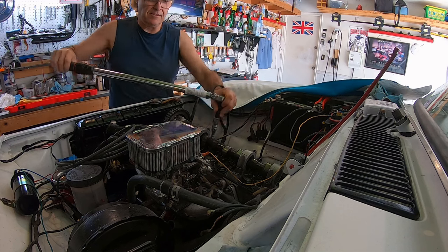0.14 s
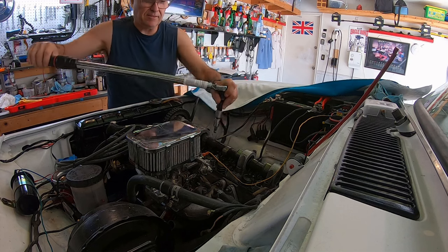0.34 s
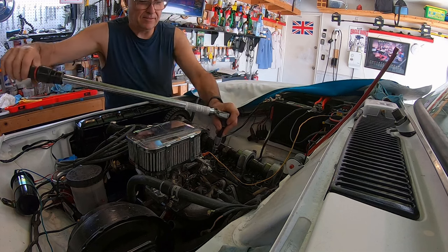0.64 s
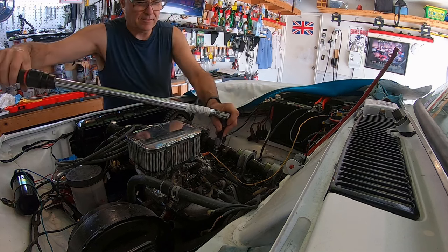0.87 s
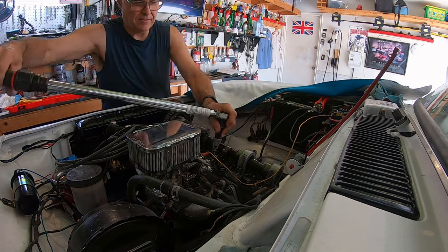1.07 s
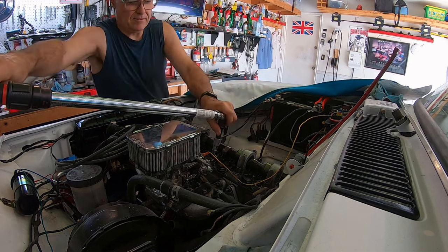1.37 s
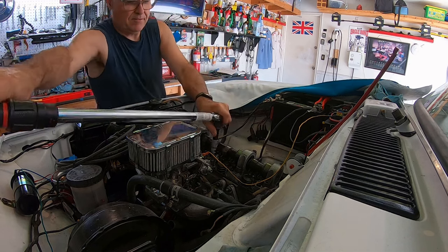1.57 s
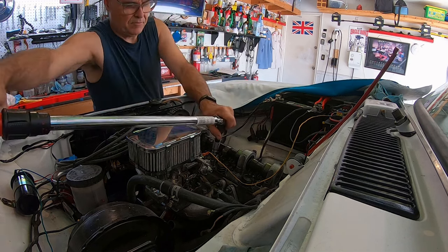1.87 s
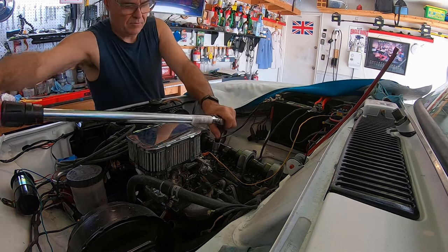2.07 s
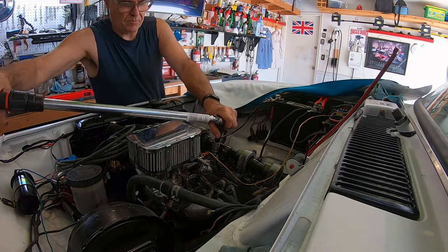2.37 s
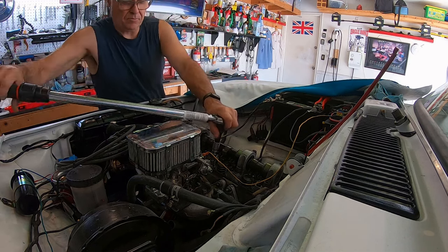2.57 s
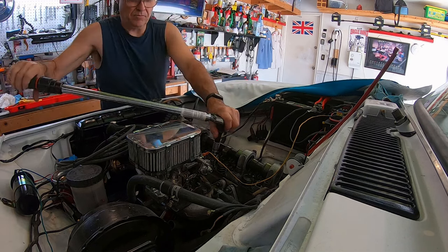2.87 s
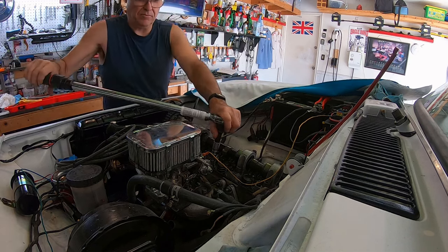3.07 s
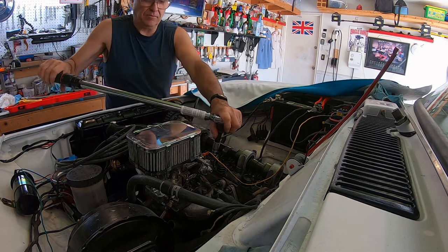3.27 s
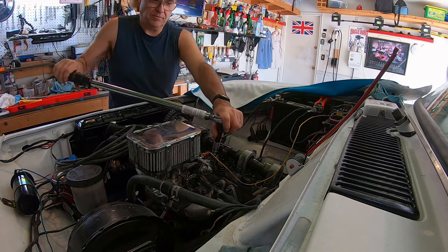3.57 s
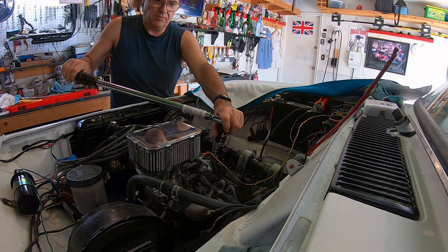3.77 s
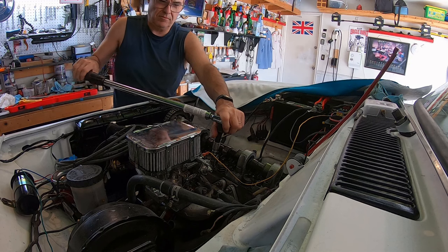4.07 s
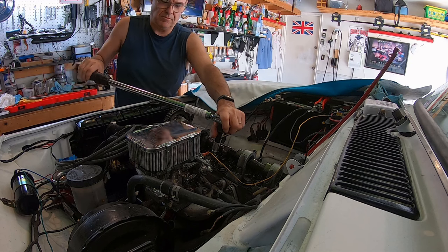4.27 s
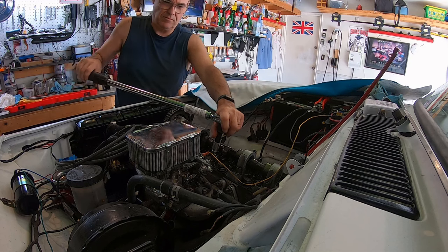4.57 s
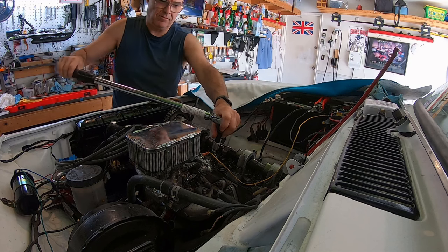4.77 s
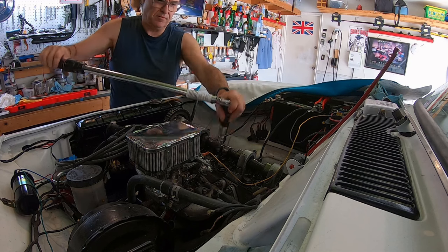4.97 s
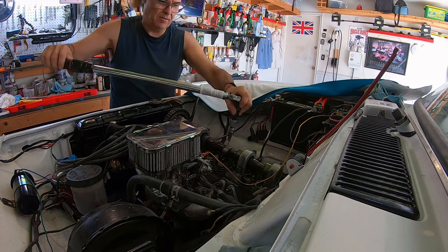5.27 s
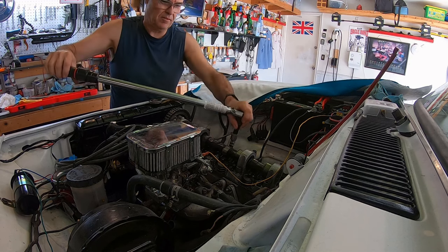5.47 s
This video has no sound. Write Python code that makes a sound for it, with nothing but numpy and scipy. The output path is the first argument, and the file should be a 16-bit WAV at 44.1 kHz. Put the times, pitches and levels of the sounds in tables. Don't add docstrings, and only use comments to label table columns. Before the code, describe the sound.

In a small garage with a roughly half-second reverberant tail, a torque wrench is worked close to a stereo microphone. Faint hiss, low traffic rumble and dull, irregular engine throbs lie far beneath the clicks. At about 0.15 s the socket slips and seats, with a soft tap at 0.23. A bright, ringing ratchet click falls at 0.84, a softer one at 1.14. Light taps at 1.5 and 1.7 lead into a short scrape, then a solid knock at 2.03. A tiny creak at 2.37 precedes a very loud, dry steel snap at 2.38 with quick rebounds. A barely audible clink comes at 3.0. After a quiet gap, another small creak and equally loud snap arrive at 4.49, then a lower, firm reset clack at 4.75. Around 5.05-5.1 the socket lifts in a quick rattling cluster with a sharp flick and gritty slide, fading before a faint clink at 5.31.

```python
import sys
import numpy as np
from scipy import signal
from scipy.fft import rfft, irfft, next_fast_len
from scipy.io import wavfile
from scipy.ndimage import uniform_filter1d

SR = 44100
rng = np.random.default_rng(int(sys.argv[2]) if len(sys.argv) > 2 else 0)


def field_ratio(decibels):
    return 10 ** (np.asarray(decibels, dtype=float) / 20)


def materialize(psi):
    bounded = np.clip(np.atleast_2d(psi).T, -1, 1)
    quanta = np.round(bounded * 32767).astype(np.int16)
    wavfile.write(sys.argv[1], SR, quanta)


N = 248283


def evened(x):
    return x / np.sqrt(np.mean(x ** 2) + 1e-20)


def read(points, hz):
    f, value = np.transpose(points)
    return np.interp(np.log(hz + 1), np.log(f + 1), value)


def add(mix, s, sound):
    part = mix[:, round(s * SR):][:, :sound.shape[1]]
    part += sound[:, :part.shape[1]]


def sides(pan_db):
    return field_ratio(np.array([[pan_db / 2], [-pan_db / 2]]))


def causal(points, size=2048):
    level_db = read(points, abs(np.fft.fftfreq(size, 1 / SR)))
    log_gain = np.log(field_ratio(np.maximum(level_db, -100)))
    taps = np.fft.ifft(np.exp(np.conj(signal.hilbert(log_gain)))).real[:size // 2]
    return taps / np.linalg.norm(taps)


def pair(gain, same, size):
    a, b, c, d = rng.standard_normal((gain.shape[1], gain.shape[0], 4)).T
    same = np.clip(same, -1, 1)[:, None]
    left = a + 1j * b
    right = same * left + np.sqrt(1 - same ** 2) * (c + 1j * d)
    z = np.array([left, right]) * gain
    return signal.istft(z, nperseg=size, noverlap=size * 3 // 4)[1]


def air():
    # (frequency [Hz], density [dB per Hz])
    hiss = [(180, -22), (300, 1), (343, -6.5), (555, -3), (725, 2.5), (1810, -8), (2360, -16.5),
            (4090, -22), (6520, -28.5), (8790, -25.5), (13000, -37.5), (16000, -43)]
    # (frequency [Hz], likeness [-1 to 1])
    likeness = [(60, 0.93), (130, 0.49), (290, 0.78), (640, -0.52), (1410, -0.26), (3100, 0.023),
                (6820, 0.39), (15000, 0.28)]
    # (frequency [Hz], left over right [dB])
    balance = [(60, -5.5), (180, -9), (550, -3.5), (1650, 0), (4970, -3), (15000, -2.5)]
    hz, frames = np.fft.rfftfreq(1024, 1 / SR), N // 256 + 5
    patches = uniform_filter1d(rng.standard_normal((frames, 513)), 30, 0)
    patches = evened(uniform_filter1d(patches, 20, 1)).T
    gain = field_ratio(read(hiss, hz)[:, None] + 0.54 * patches)
    x = pair(gain, read(likeness, hz), size=1024)
    size = x.shape[1]
    lean = field_ratio(read(balance, np.fft.rfftfreq(size, 1 / SR)) / 2)
    leaning = irfft(rfft(x) * [lean, 1 / lean], size)[:, :N]
    return field_ratio(-64.5) * evened(leaning)


def swells(rows, rest_db, rise, fall):
    t = np.arange(N) / SR
    gain = field_ratio(rest_db)
    for s, hold, db in rows:
        before, after = np.maximum(s - t, 0), np.maximum(t - s - hold, 0)
        gain = gain + field_ratio(db - rise * before - fall * after)
    return gain


def low_band(shape, gain, same, pan_db):
    hz, frames = np.fft.rfftfreq(4096, 1 / SR), np.ones(N // 1024 + 5)
    spectrum = shape(hz)[:, None] * frames
    band = evened(pair(spectrum, same + 0 * hz, size=4096)[:, :N])
    return band * gain * sides(pan_db)


def body_shakes():
    # (start [s], hold [s], level [dB])
    bumps = [
        (0, 0.14, -48),
        (.32, .02, -57),
        (2.08, 0.022, -59),
        (4.53, .31, -51),
    ]
    gain = swells(bumps, rest_db=-76, rise=610, fall=260)
    return low_band(lambda hz: 1 / (1 + ((hz - 45) / 6.4) ** 4), gain, same=.3, pan_db=-12)


def engine_hum():
    # (time [s], level [dB])
    throbs = [(0, -46), (.17, -56), (.33, -51), (.48, -51.5), (.73, -54.5), (1.06, -48.5), (1.39, -54.5),
              (1.65, -55.5), (2.01, -56.5), (3.0, -59.5), (3.25, -54.5), (4.17, -52), (4.67, -56.5),
              (5.251, -49.5), (5.45, -58.5), (5.6, -54)]
    # (start [s], hold [s], level [dB])
    drones = [
        (2.22, 0.21, -66.5),
        (3.4, 0.26, -59.5),
        (3.65, 0.19, -54.5),
        (4.0, 0.13, -53.5),
    ]
    rows = [(s, 0, db) for s, db in throbs] + drones
    gain = swells(rows, rest_db=-74.5, rise=210, fall=180)
    return low_band(lambda hz: 1 / (1 + ((hz - 82) / 20.0) ** 4), gain, same=.9, pan_db=-1.5)


def traffic():
    # (frequency [Hz], level [dB])
    lumps = [(95, -34), (112, -13.5), (121, 1), (132, -2.5), (165, -2), (200, -2), (240, -2.5), (270, -15),
             (310, -12.5), (450, -33)]
    # (start [s], hold [s], level [dB])
    passes = [(.9, 0.026, -62.5), (1.63, 0.2, -60.5), (2.08, 0.021, -61.5), (2.28, 0.53, -61),
              (4.5, 0.059, -63), (4.82, 0.024, -62.5)]
    gain = swells(passes, rest_db=-58.5, rise=210, fall=64)
    return low_band(lambda hz: field_ratio(read(lumps, hz)) * (hz < 600) * (hz > 60), gain, same=.55, pan_db=-1.5)


def whistles():
    # (start [s], end [s], pitch [Hz], width [Hz], level
    # [dB])
    near_songs = [(0, .5, 3420, 190, -66.5), (.2, 1.2, 1420, 95, -66), (1.15, 1.8, 1320, 140, -62.5),
                  (0, 8.5, 100, 4.3, -67), (1.2, 1.5, 3020, 310, -69), (.143, .19, 6400, 370, -55.5),
                  (4.901, 5.55, 3176, 180, -67.5), (4.9, 5.1, 1800, 260, -64)]
    # (start [s], end [s], pitch [Hz], width [Hz], level [dB])
    far_songs = [(.58, .96, 8560, 25, -92), (3.21, 3.56, 5690, 15, -86), (3.29, 3.37, 4960, 40, -85),
                 (3.41, 3.56, 5320, 60, -83), (3.62, 3.87, 8580, 15, -89)]
    sags = [.12, .18, .02, 0, 0, -9, .05, 0, 0, -.04, 0, .6, 0]
    out = np.zeros((2, N))
    for (start, end, hz, width, level_db), sag in zip(near_songs + far_songs, sags):
        t = np.arange(0, end - start, 1 / SR)
        r = np.exp(-np.pi * width / SR)
        slow = signal.lfilter([1], [1, -r], rng.standard_normal((2, 2, len(t))))
        turn = 2 * np.pi * hz * (t - sag * t ** 2 / 2)
        tone = slow[0] * np.cos(turn) + slow[1] * np.sin(turn)
        fade = abs(np.sin(np.pi * (t / t[-1]) ** .6)) ** .6
        add(out, start, field_ratio(level_db) * evened(tone) * fade)
    return out


def slide():
    # (time [s], level [dB])
    rub_levels = [
        (4.86, -90),
        (5.094, -54.5),
        (5.246, -70),
        (5.448, -66.5),
        (5.63, -80),
    ]
    # (frequency [Hz], density [dB per Hz])
    rub_colour = [(710, -49.5), (1200, -11.5), (1500, 2), (3070, -18.5), (3880, -15), (9420, -15),
                  (15000, -37)]
    s, level_db = np.transpose(rub_levels)
    t = np.arange(s[0], s[-1], 1 / SR)
    grains = rng.standard_normal((len(t), 2)).T * field_ratio(2.8 * rng.exponential(1, len(t)))
    mixed = grains + 0.36 * grains[::-1]
    rub = signal.fftconvolve(mixed, causal(rub_colour)[None], axes=1)[:, :len(t)]
    fade_in = np.minimum((t - s[0]) / 0.076, 1)
    out = np.zeros((2, N))
    add(out, s[0], evened(rub) * field_ratio(np.interp(t, s, level_db)) * fade_in)
    return out


def garage():
    # (frequency [Hz], t60 [s])
    decay = [(200, 0.45), (600, 0.54), (1300, 0.51), (3500, 0.46), (9000, 0.38), (14000, 0.25)]
    # (frequency [Hz], likeness [-1 to 1])
    likeness = [(60, 0.11), (120, 0.89), (240, 1), (480, 0.29), (950, 0.22), (1890, 0.64), (3770, 0.41),
                (7520, 0.37), (15000, 0.99)]
    # (delay [s], level [dB])
    echoes = [(.0013, -15), (.0042, -10), (.0078, -12), (0.012, -12.5), (0.015, -15.5), (.019, -23.5)]
    hz, t = np.fft.rfftfreq(256, 1 / SR), np.arange(450) * 64 / SR
    gain = field_ratio(-60 * t / read(decay, hz)[:, None])
    tail = pair(gain, read(likeness, hz), size=256)
    tail = tail * (1 - np.exp(-np.arange(tail.shape[1]) / SR / 0.0018))
    near = np.zeros((2, 1024))
    at, echo_db = np.transpose(echoes)
    for side in near:
        side[np.round(at * SR).astype(int) + rng.integers(0, 3, len(at))] += field_ratio(echo_db)
    return near, tail / np.linalg.norm(tail[0])


def steel_ring(rings, ring_db):
    blur = .005
    beat_hz, beat_depth = 29.7, 0.91
    longest_t60, carry_t60 = .4, .08
    t = np.arange(SR // 3) / SR
    modes = []
    for hz, db, t60 in rings:
        drift = np.cumsum(rng.standard_normal(len(t))) * np.sqrt(2 * np.pi * blur * hz / SR)
        beat = beat_hz * (.5 + rng.random())
        decay = field_ratio(db - 60 * t / min(t60, longest_t60))
        pulse = 1 + beat_depth * np.cos(2 * np.pi * beat * t)
        modes.append(decay * np.sin(2 * np.pi * hz * t + drift) * pulse)
    steel = np.sum(modes, axis=0)
    lasting = np.minimum(np.array(rings)[:, 2] / carry_t60, 1) @ np.array(modes)
    scale = field_ratio(ring_db) / np.linalg.norm(steel)
    return scale * steel, scale * lasting


def rattle(force):
    grit = field_ratio(1 * rng.exponential(1, 4096))
    impacts = force * rng.standard_normal(4096) * grit
    power = uniform_filter1d(abs(rfft(impacts)) ** 2, 48)[::32]
    hz = np.fft.rfftfreq(4096, 1 / SR)[::32]
    flatten = np.column_stack([hz, -10 * np.log10(power + 1e-9)])
    return signal.fftconvolve(impacts, causal(flatten))


def contacts(rows, colour, rings, ring_db, dull_hz, pan_db):
    out, u = np.zeros((2, N)), np.arange(4096) / SR
    near, tail = garage()
    steel, lasting = steel_ring(rings, ring_db)
    tick = causal(colour)
    shadow = signal.butter(2, [910, min(dull_hz, SR / 2.2)], "band", fs=SR)
    for s, peak_db, rise, fall, room_db in rows:
        growth = np.sqrt(u / max(rise, 1 / SR))
        force = np.where(u < rise, growth, np.exp(-(u - rise) / max(fall, 1 / SR)))
        impacts = rattle(force)
        ring = np.roll(np.append(steel, np.zeros(4096)), np.argmax(force))
        crack = signal.fftconvolve(impacts / np.linalg.norm(impacts), tick)
        crack = np.append(crack, np.zeros(len(ring) - len(crack)))

        direct = signal.lfilter(*shadow, crack) + ring
        energy = np.sum(force ** 2)
        level = field_ratio(peak_db) * np.sqrt(energy / 9 + 4) / np.linalg.norm(direct)
        both = np.array([direct, (direct + np.roll(direct, 1)) / 2])
        add(out, s + .0006, level * both * sides(pan_db))

        room = level * field_ratio(room_db)
        early = signal.fftconvolve((crack + 1.3 * ring)[None], near, axes=1)
        add(out, s + .0006, room * early)

        filled = np.sqrt(np.interp(np.arange(tail.shape[1]), np.arange(4096), np.cumsum(force ** 2) / energy))
        uneven = .6 * min(1, (rise + fall) / .011) ** 2
        smooth = np.append(tick, np.zeros(len(steel) - len(tick)))
        voice = smooth * np.sqrt(1 - uneven) + np.sqrt(uneven) * crack[:len(steel)] + 1.4 * lasting
        add(out, s + .0006, room * signal.fftconvolve(voice[None], filled * tail, axes=1))
    return out


def wrench():
    # (time [s], peak level [dB], rattle rise [s], rattle fall [s], garage level [dB])
    seat = [
        (.139, -49, 0.0036, .0053, 4),
        (.166, -39, 0.012, 0.0097, -6.5),
    ]
    slip = [
        (.144, -45, 0.00482, 0.021, 2.2),
    ]
    tap = [(.0028, -68.5, .0009, 0.022, 16.5), (.233, -44, .0009, 0.016, -3),
           (1.5151, -41.5, .0009, 0.0029, 2.5), (1.5553, -63.5, .0024, 0.0055, 16.5),
           (1.693, -43, 0.0034, 0.0076, 3.5), (5.049, -47.5, 0.0028, .005, 7.5)]
    pawl_a = [
        (0.825, -52.5, 0.0054, 0.0057, 0),
        (0.8366, -18, .0084, 0.0019, -1.85),
    ]
    pawl_b = [
        (1.126, -39.5, 0.0045, 0.0067, 0),
        (1.1355, -26, 0.0092, 0.0088, -4),
    ]
    scrape = [
        (1.712, -47.5, 0.0051, .01, 4),
        (1.73, -37, .017, .0048, -7.5),
        (1.753, -37, 0.0015, .0077, -7),
    ]
    knock = [
        (2.014, -40, 0.004, 0.011, 4.5),
        (2.0296, -19, 0.002, 0.0032, -0.5),
        (2.0337, -21.5, 0.0013, .007, -8),
    ]
    creep_a = [
        (2.0133, -29.5, .002, .009, -2),
        (2.3627, -48.5, 0.00012, .00028, 2),
        (2.3693, -21.5, 0.0002, .0004, -2.5),
    ]
    snap_a = [
        (2.384, -4.5, 0.0004, .0006, -2.5),
        (2.388, -14.5, 0.00064, 0.00065, -8),
        (2.392, -20.5, 0.0007, 0.003, -8),
    ]
    clink = [
        (2.9946, -60.5, 0.0025, 0.0051, 0),
        (5.3126, -40.5, 0.00139, 0.0024, 0),
    ]
    creep_b = [
        (4.4655, -44.5, 0.0003, 0.001, 1),
        (4.4763, -32.5, 0.0003, .001, -9),
    ]
    snap_b = [
        (4.487, -5.5, 0.00026, 0.0016, -1.5),
        (4.4935, -21, 0.00044, .0012, -5),
    ]
    reset = [
        (4.749, -14.5, 0.0006, 0.00079, -4.5),
        (4.7557, -22, 0.000051, 0.0022, -15),
    ]
    lift = [
        (5.0615, -25.5, 0.0014, 0.004, -4),
        (5.066, -23, 0.0018, 0.0084, -2.5),
        (5.079, -26.5, 0.0028, .006, -12),
        (5.089, -25, 0.003, 0.01, -15),
    ]
    flick = [
        (5.074, -23, 0.000087, 0.00031, -27),
    ]
    # (frequency [Hz], density [dB per Hz])
    ratchet_colours = [
        [(500, -33), (819, -3), (1900, -15), (3490, -14), (5710, -17), (8450, 2), (16000, -46)],
        [(290, -37), (500, 2.5), (1060, -21), (1280, 9.5), (2360, 1.5), (3290, 6), (5020, -8.5), (7000, -10.5),
         (16000, -43.5)],
        [(300, -27), (893, -34), (994, -9.5), (1790, -4), (2930, -6.5), (6150, -4), (10100, -17), (16000, -82)],
        [(300, -33), (1060, -20), (1200, -5), (1790, 2.5), (2360, -6.5), (3750, -1.5), (8630, -10), (9320, -15),
         (16000, -55)],
        [(180, -27), (300, 3), (1340, -2.5), (4020, -6.5), (5250, -10), (9710, -18.5), (11500, -49),
         (16000, -58.5)],
    ]
    blow_colours = [
        [(88, -43.5), (150, 10.5), (800, -4.5), (1980, -4.5), (4000, -1.5), (9080, -6), (11500, -16),
         (14500, -25.5), (16000, -41)],
        [(150, -44), (250, -22), (955, -23.5), (1300, -9.5), (2600, -9), (3300, -4.5), (5070, -1.5),
         (5700, -11), (9830, -6), (11500, -30), (14200, -22), (16000, -52)],
        [(150, -37.5), (300, -20), (1060, -20), (1550, 0.5), (2440, -7.5), (3350, -4.5), (4600, -11),
         (6040, -1.5), (7000, -14), (8260, 0), (11300, -22.5), (14700, -31), (16000, -47)],
        [(150, -64), (250, 1), (538, -26), (1260, -6), (1750, 1.5), (2160, -11.5), (3000, -9.5), (8260, -19),
         (10400, -26.5), (11500, -48), (16000, -51)],
    ]
    socket_colours = [
        [(240, -55), (400, -18.5), (1600, -8.5), (2670, -5), (3120, 3.5), (3580, -4.5), (5870, -7.5),
         (6740, -3.5), (9610, 2), (16000, -14.5)],
        [(590, -47), (1000, -25), (1520, -7.5), (2530, -14), (3120, -11), (7020, -21.5), (9720, -10),
         (11600, -22), (14400, -23), (16000, -56)],
        [(880, -39), (1500, -13), (3320, 3), (5250, -12), (6950, -1), (11600, -34), (14000, -18)],
        [(5000, -29), (8000, -23), (11000, 13), (16000, -8)],
    ]
    creep_colours = [
        [(600, -35), (1500, -2), (2600, -2), (4800, -2.5), (6200, -12), (7500, -24.5), (9500, -19),
         (11500, -45)],
        [(600, -31), (1600, -7), (2400, -13), (3320, 0.5), (4600, -19), (6100, -6), (7300, -24), (8500, -12.5),
         (11000, -46)],
    ]
    # (frequency [Hz], level [dB], t60 [s])
    ratchet_rings = [
        [(3320, -16, 2.6), (7300, 9, 0.11), (9000, 1, 0.37)],
        [(4400, -12, .02)],
        [(1740, 1.5, 0.2), (2490, -18, .2), (2690, -2, 0.24), (3005, 3.5, 0.28), (3500, -8, 0.24),
         (3970, 5, 0.2), (5000, -8, 0.2), (5250, -4, 0.2), (6030, 6.5, 0.3), (6520, 3, 0.37), (7020, 6, 0.25),
         (7540, 3.5, 0.22), (8180, 4, 0.17)],
        [(1821, 6, 0.13), (2810, 5, 0.18), (3400, 3, 0.091), (3670, 10, 0.086), (4180, -5, 0.11),
         (4540, -2, 0.09), (6300, 8, 0.1), (6850, -1, .1), (8160, 6, .08)],
        [(1363, -8, 0.044), (5280, 15, .04)],
    ]
    blow_rings = [
        [(140, -3.5, 0.098), (205.7, -9, .1), (315.7, -8, 0.054), (500, -1.5, 0.03), (790, -2.5, 0.03),
         (1320, -1, .03), (1553, 2, .03), (2550, 8, 0.022)],
        [(3760, 3, .012), (4520, 4, .012), (5140, 3, .06), (4840, 0.5, .08), (5360, -5.5, .25), (8270, -7, .2),
         (8950, -10, .15), (9500, -9.5, 0.089)],
        [(1600, 6, 0.045), (2080, -5.5, .1), (3420, 17, 0.039), (5690, 0, .02), (6140, -12, .2),
         (6320, -9, 0.104), (8200, -10, .1), (8800, -7.5, .15), (9200, -12, .08)],
        [(1750, 10.5, 0.022), (2950, 13, 0.013), (563, -3, 0.12)],
    ]
    socket_rings = [
        [(3100, -9.5, 0.034), (6970, -2, 0.067), (8060, -11, 0.11), (9570, 1, .015)],
        [(3270, -5, .1), (9840, 5, 0.015)],
        [(6950, 0, 0.046)],
        [(9600, 0, 0.022)],
    ]
    creep_rings = [
        [(4800, 0, .02)],
        [(3320, -2, .02), (6100, 0, .02)],
    ]
    ring_levels = [-33, -12, -6.5, -5.5, -18, -9.5, -9, -6.5, -7, -7, -13, -18, -6, -9.5, -13]
    dull_limits = [12100, 7060, 9000, 10400, 9020, 9700, 5430, 6200, 4030, 14100, 11900, 12000, 17700, 6970,
                   7000]
    places = [-5, 6, -4.5, -4, 4, -3, 2.5, 4.5, 4.5, -1, 4, -2, -37, 2.5, 1.5]
    parts = [seat, tap, pawl_a, pawl_b, scrape, knock, snap_a, snap_b, reset,
             lift, clink, slip, flick, creep_a, creep_b]
    colours = ratchet_colours + blow_colours + socket_colours + creep_colours
    rings = ratchet_rings + blow_rings + socket_rings + creep_rings
    settings = zip(parts, colours, rings, ring_levels, dull_limits, places)
    return sum(contacts(*part) for part in settings)


def scene():
    rumble = body_shakes() + engine_hum() + traffic()
    return air() + rumble + whistles() + slide() + wrench()


def band_limit(x):
    return signal.sosfilt(signal.butter(12, 16490, fs=SR, output="sos"), x)


def record(dry):
    size = next_fast_len(N + 8192)
    hz = np.fft.rfftfreq(size, 1 / SR)
    response_db = np.interp(hz, [20, 42, 10300, 11200, 15000, 16500], [-22.5, -1.5, 2.5, -5.5, 4.5, -42.5])
    mix = irfft(rfft(dry, size) * field_ratio(response_db), size)[:, :N]
    return band_limit(mix)


dry = scene()
out = record(dry)
materialize(out)
```